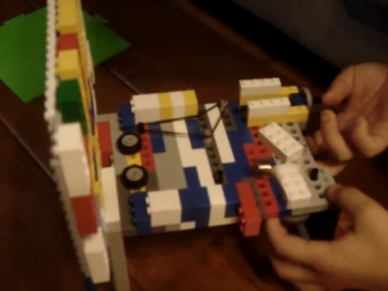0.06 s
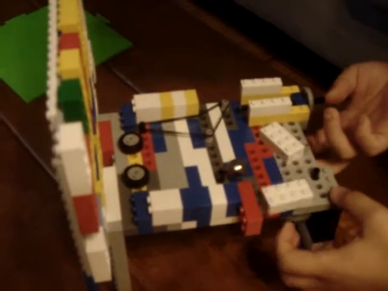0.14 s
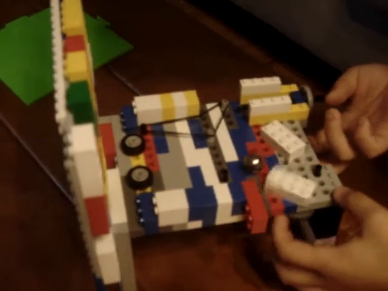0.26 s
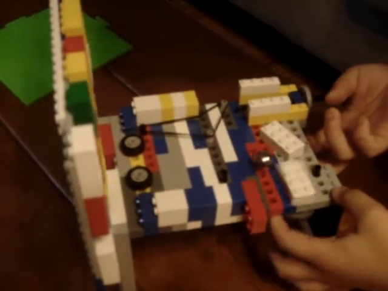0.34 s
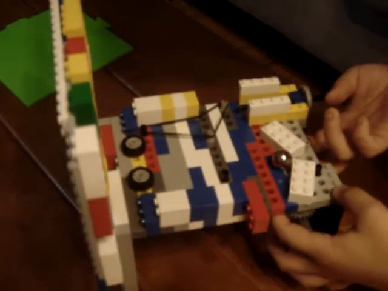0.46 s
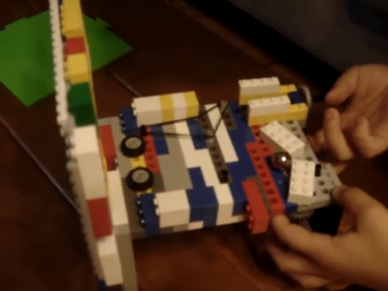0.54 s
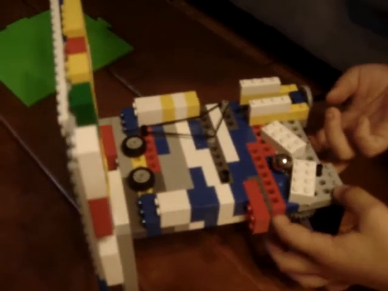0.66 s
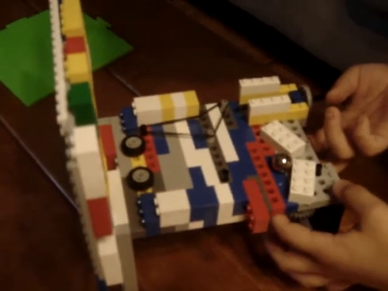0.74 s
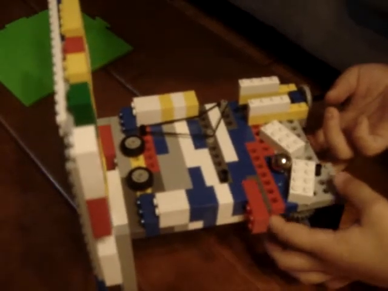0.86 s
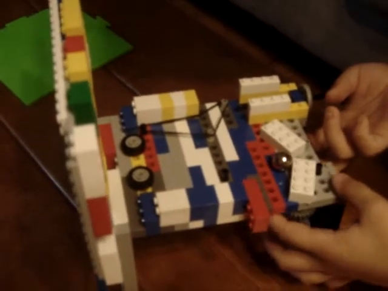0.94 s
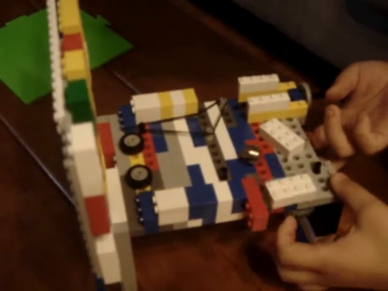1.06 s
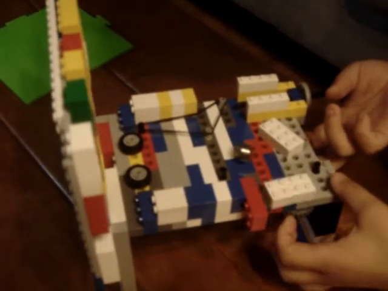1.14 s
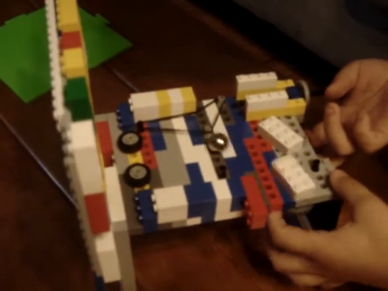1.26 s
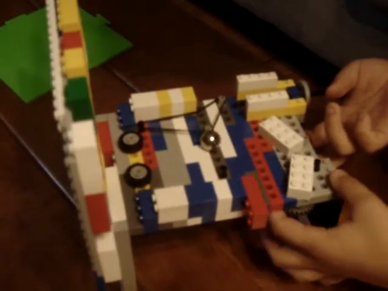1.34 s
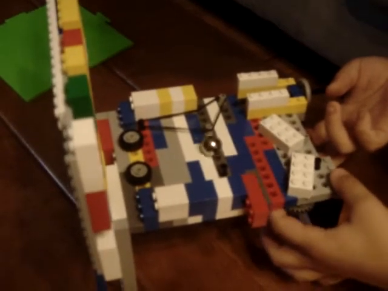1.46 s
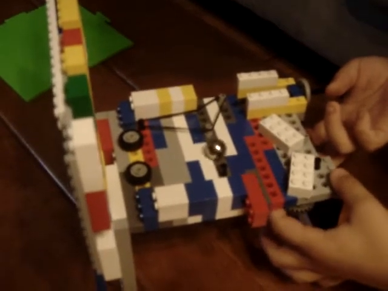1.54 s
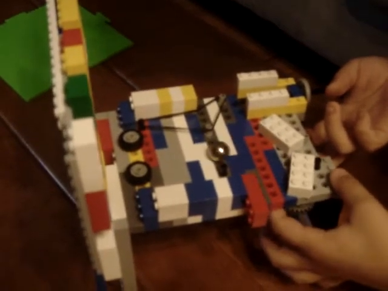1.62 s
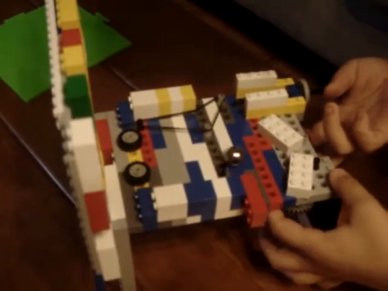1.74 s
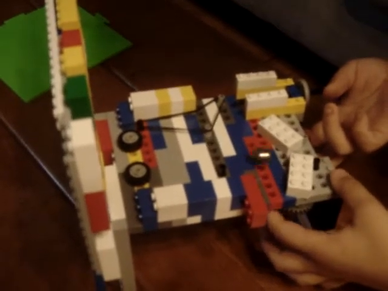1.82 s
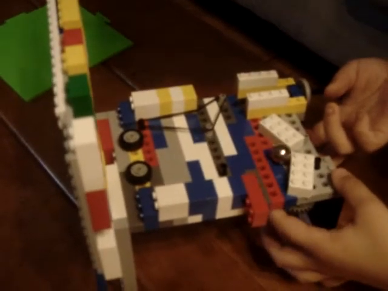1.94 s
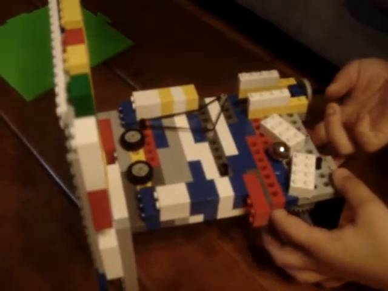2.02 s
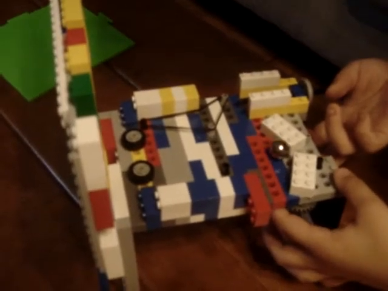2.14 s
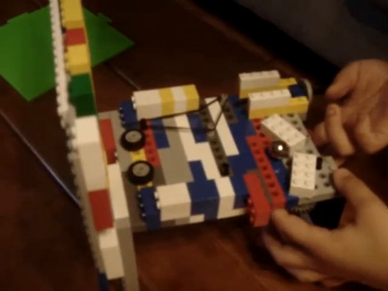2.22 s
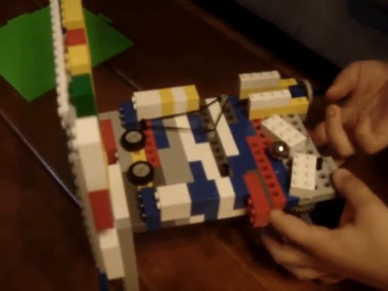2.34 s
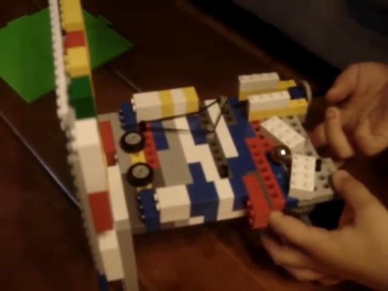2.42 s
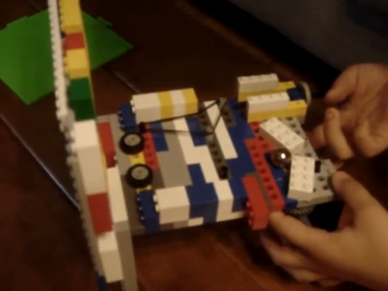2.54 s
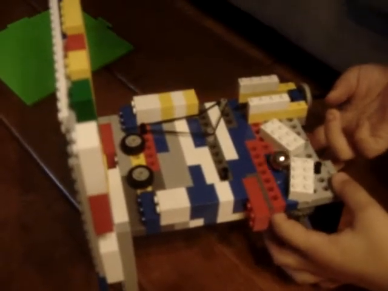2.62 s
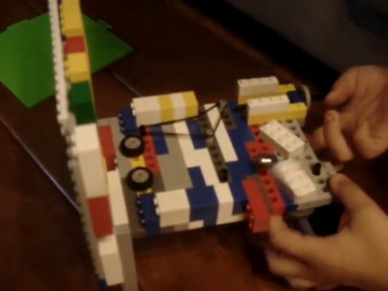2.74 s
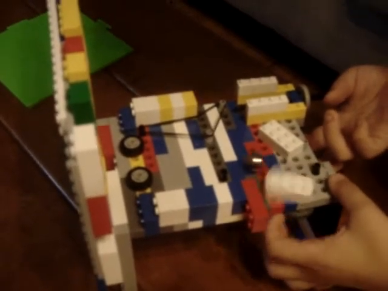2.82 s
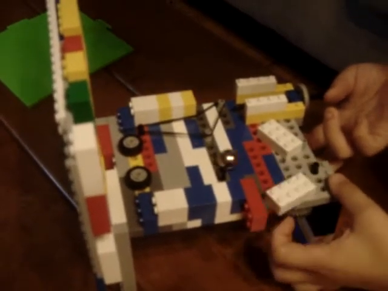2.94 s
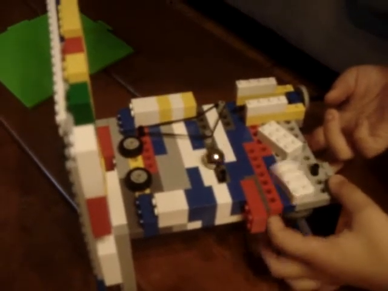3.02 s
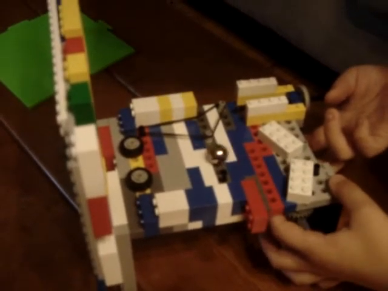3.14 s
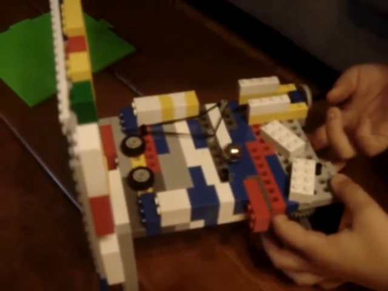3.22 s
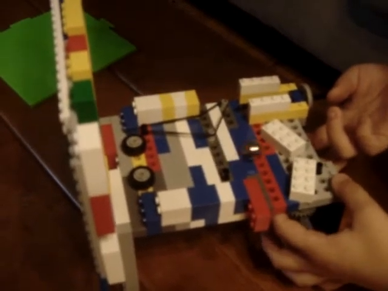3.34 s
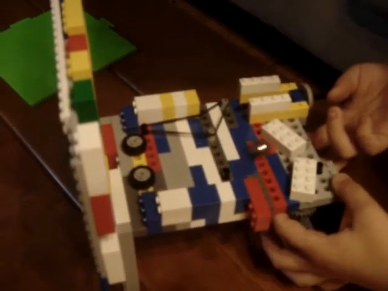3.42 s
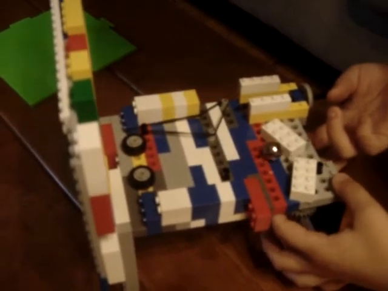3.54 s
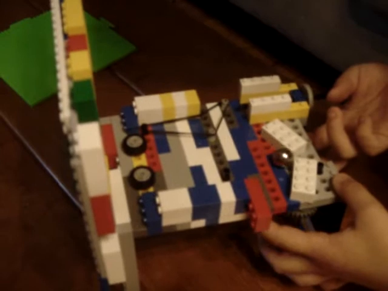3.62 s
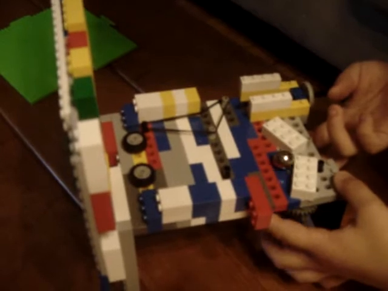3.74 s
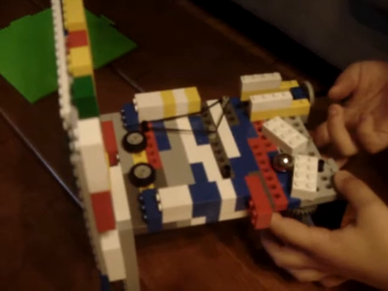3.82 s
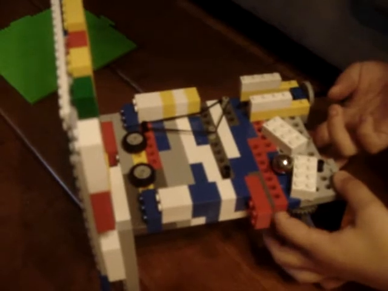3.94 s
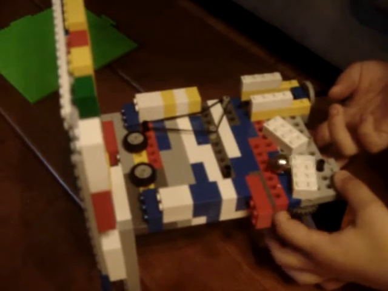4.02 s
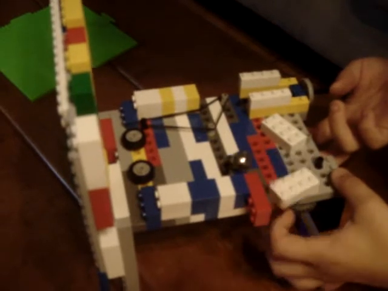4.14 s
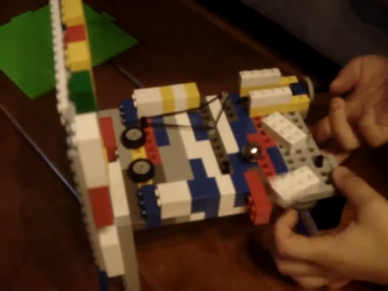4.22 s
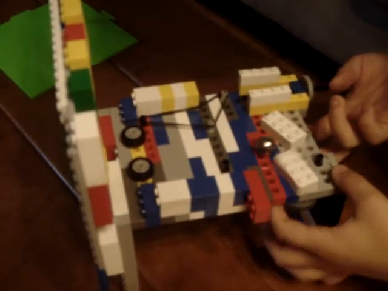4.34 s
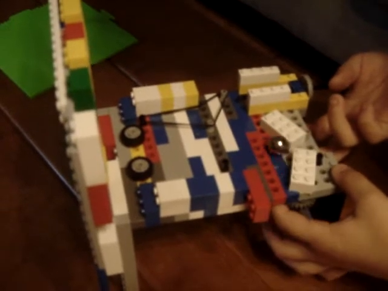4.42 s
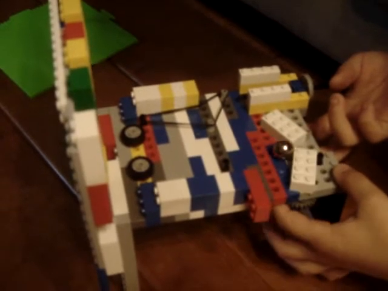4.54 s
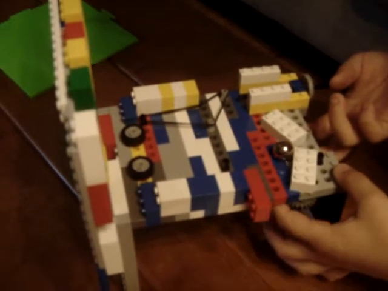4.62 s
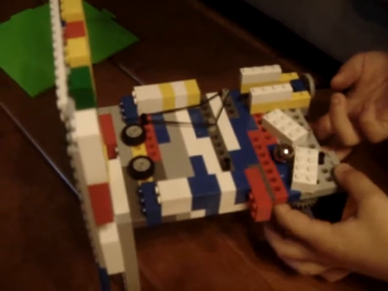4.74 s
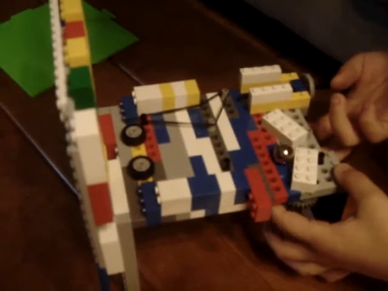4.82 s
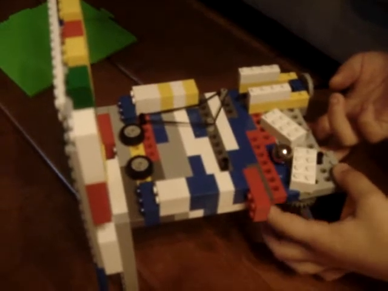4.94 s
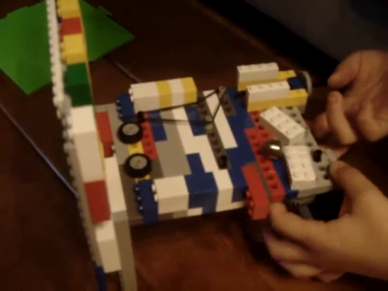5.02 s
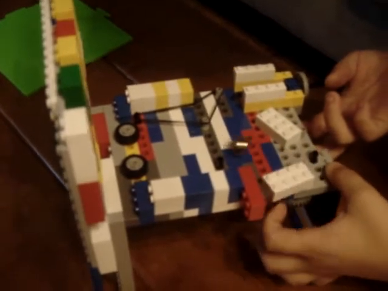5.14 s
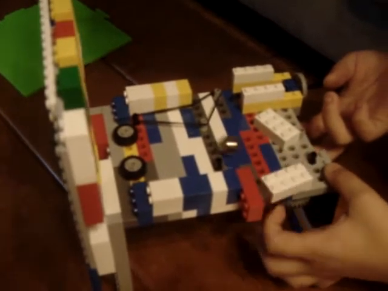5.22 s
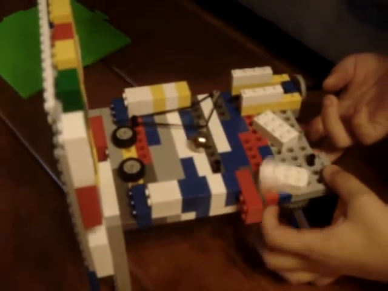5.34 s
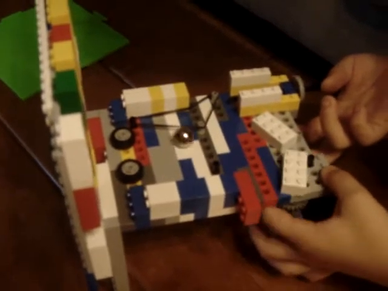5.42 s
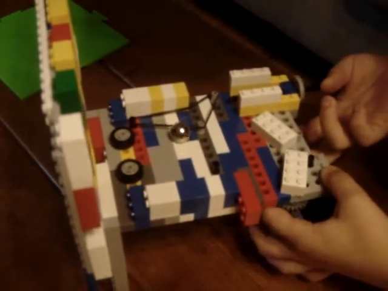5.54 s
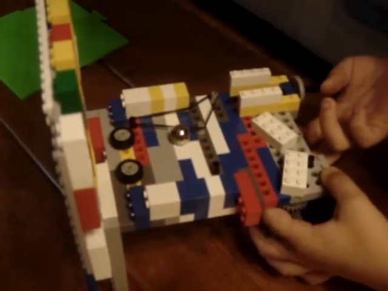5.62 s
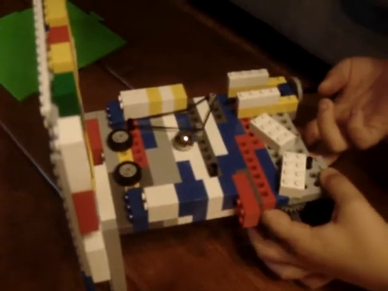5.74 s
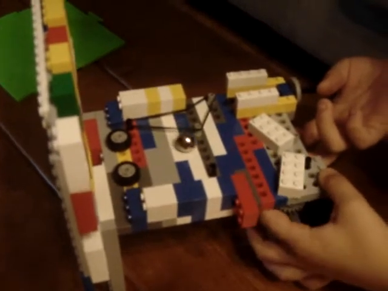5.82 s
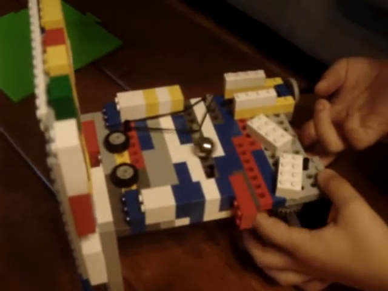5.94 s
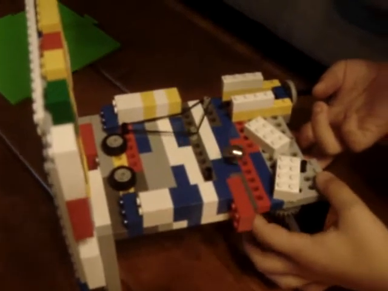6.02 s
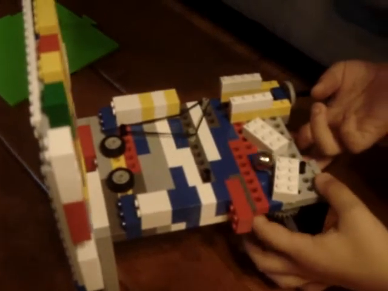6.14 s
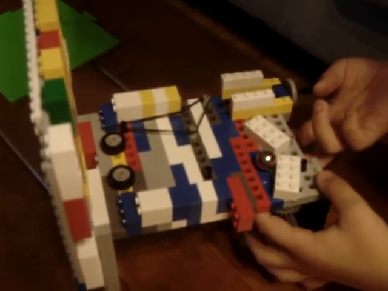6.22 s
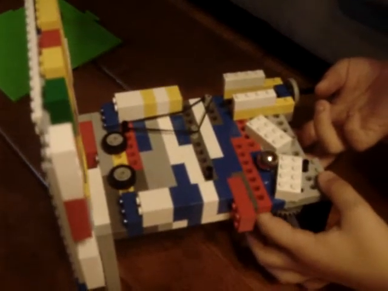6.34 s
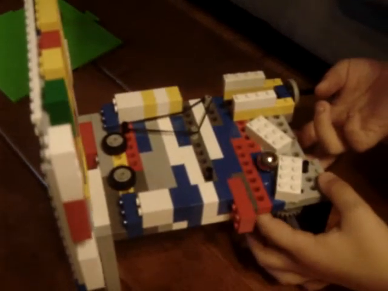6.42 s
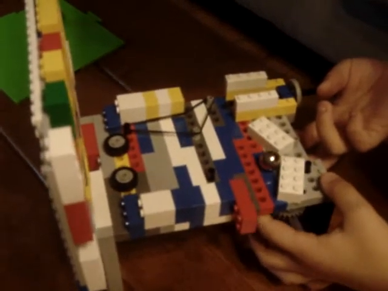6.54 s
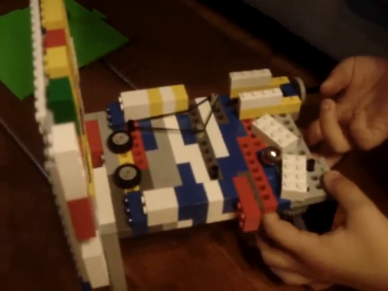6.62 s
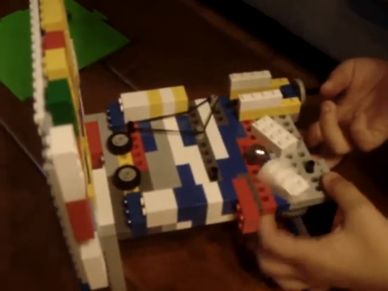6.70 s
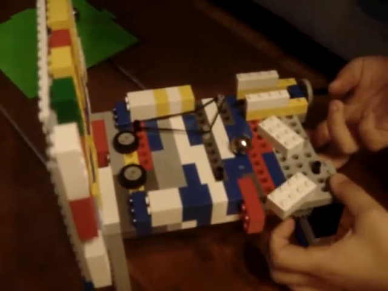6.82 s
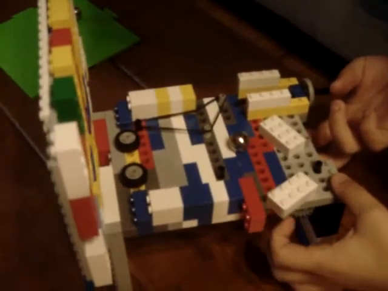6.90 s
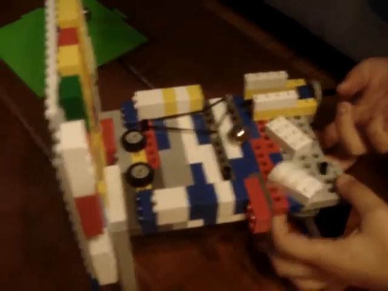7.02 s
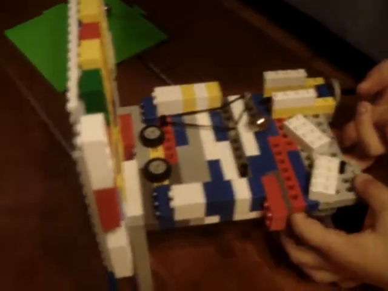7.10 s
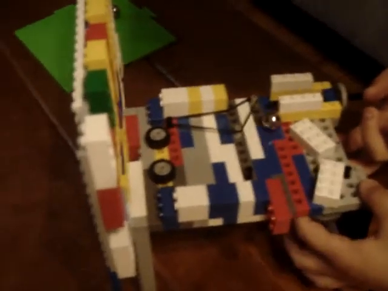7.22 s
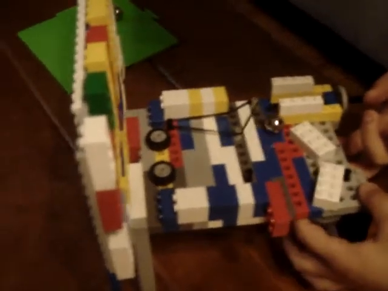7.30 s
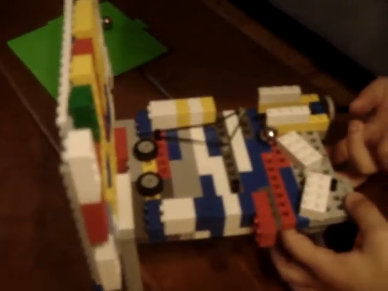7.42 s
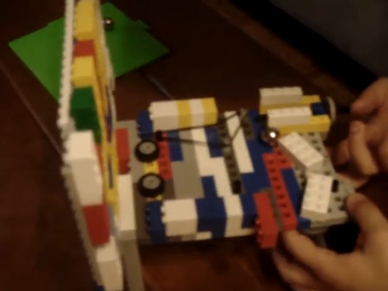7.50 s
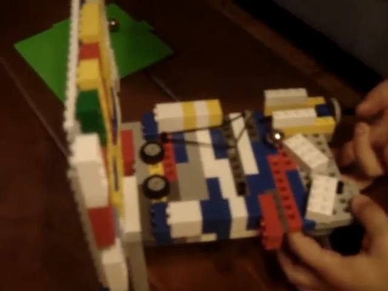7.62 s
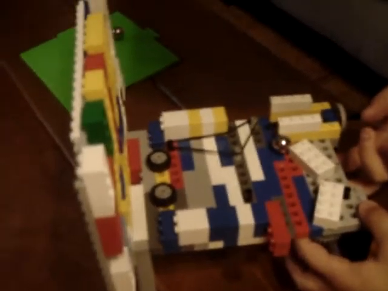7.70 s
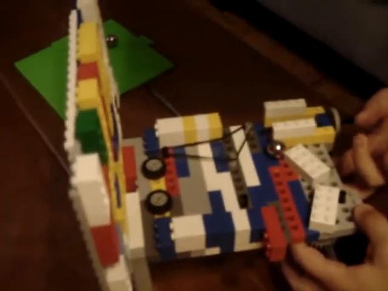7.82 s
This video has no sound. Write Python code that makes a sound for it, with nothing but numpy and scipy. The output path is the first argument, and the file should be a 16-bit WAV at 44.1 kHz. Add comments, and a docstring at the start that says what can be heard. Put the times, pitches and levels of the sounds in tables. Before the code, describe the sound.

Close up in a small room, a pinball machine of plastic bricks is played on a wooden table. Six sharp flipper snaps, each with a loose rattle, send a small steel ball rolling faintly over tiles and clacking against hollow walls. The base thuds softly. Behind it a vehicle-like rush and low engine hum swell and fade, over microphone hiss and a thin high whine.

```python
"""In a small room, a pinball machine of plastic bricks plays on a wooden table.
Flippers snap and a steel ball clacks on brick walls: shaped noise bursts excite resonances and damped modes.
The base thuds on the table and the ball chatters over tiles, while the room returns reflections and a tail.
Behind, coloured noise and two rising engine harmonics swell and fade, like a vehicle passing outside;
a steady hiss and a thin electronic whine lie underneath."""
import sys
import numpy as np
from scipy import signal
from scipy.fft import rfft, irfft, next_fast_len
from scipy.io import wavfile
from scipy.ndimage import uniform_filter1d, map_coordinates

SR = 44100
rng = np.random.default_rng(int(sys.argv[2]) if len(sys.argv) > 2 else 0)


def waveform_to_disk(signal):
    """Save audio, clipped to [-1, 1], as 16-bit WAV at the path in sys.argv[1]."""
    frames = np.transpose(np.atleast_2d(signal))
    scaled = np.clip(frames, -1, 1) * 32767
    samples = np.round(scaled).astype(np.int16)
    wavfile.write(sys.argv[1], SR, samples)


N = 347033

# Contact levels below stand ahead of the gain of the function that plays them.
# strokes of the flipper: [t/s, body level/dB, clack level/dB, edge level/dB, looseness (times the decay),
# time to the stop/s, time to the slide back/s, slide level/dB, clatter level/dB, clatter time/s, roll time/s]
FLIPS = [(0.131, -30.5, -25, -23.5, 2.3, 0.015, 0.13, -36.5, -31, .05, 0.55),
         (1.1023, -25, -23.5, -17.5, 2.1, 0.024, 0.12, -39.5, -23, 0.1, 1),
         (2.8222, -31, -24.5, -23, 2, 0.021, 0.21, -39.5, -21, 0.033, 0.53),
         (4.1055, -30.5, -27, -25, 2.5, 0.023, 0.22, -38.5, -25, 0.094, 0.23),
         (5.153, -30, -20.5, -17.5, 1.9, .019, .197, -44, -27, .06, 1),
         (6.782, -31.5, -20.5, -18, 1.8, 0.024, 0.2, -38.5, -35, 0.033, 0.95)]
# the flipper's own ring and its upper ring: [f/Hz, f/Hz]
FLIPPER_HZ = (3385, 6540)
# dull top of a flipper, which has no hard steel contact: [f/Hz, level/dB]
FLIPPER_TOP = [(7200, -1.5), (8200, -10.5), (10000, -8.5)]
# impact on the stop: body and clack relative to the snap (dB), looseness
STOP_BODY_DB, STOP_CLACK_DB, STOP_LOOSENESS = 0.5, -8, 3
# slide back with a long, faint rattle: clack relative to body (dB), looseness
SLIDE_CLACK_DB, SLIDE_LOOSENESS = -3.5, 7
# clatter on the axle: mean gap (s), fall over the clatter time (dB), scatter (dB)
TAP_GAP_S, TAP_FALL_DB, TAP_SCATTER_DB = 0.0064, 8, 6.5

# impacts of the ball on bricks: [t/s, body level/dB, clack level/dB, edge level/dB,
# ring f/Hz, upper ring f/Hz, looseness (times the decay)]
KNOCKS = [(0.181, -32.5, -44, -49, 3200, 6800, 0.88), (0.203, -30, -44, -36.5, 1100, 6800, 1.6),
          (0.448, -36, -43.5, -61, 2730, 6300, 0.47), (0.4752, -35.5, -36, -68, 4170, 6300, 0.47),
          (0.492, -27.5, -30.5, -20.5, 3930, 7000, 0.6), (0.4992, -35, -27, -21.5, 4400, 6950, 3.1),
          (0.751, -44, -43.5, -47, 4350, 6800, 1.1), (1.051, -36.5, -42, -44, 4280, 6900, 1.5),
          (1.086, -31, -43, -62, 3950, 6500, 0.6), (1.118, -14, -23.5, -26, 990, 6800, 1.2),
          (1.384, -29, -31.5, -27, 1450, 7200, 1.15), (1.63, -31, -54, -52, 1090, 6500, 0.65),
          (1.746, -38, -47.5, -44, 4570, 6300, 1.2), (1.815, -34.5, -46, -49, 4140, 6460, 1.9),
          (1.948, -34, -45, -47, 4730, 6260, 0.43), (1.986, -22, -18, -17.5, 3790, 7640, 0.7),
          (2.0003, -32, -29, -31, 3960, 6300, 1.1), (2.556, -40, -40, -46, 3670, 6260, 1.5),
          (3.1717, -29.5, -32.5, -30, 4150, 7000, 0.79), (3.4459, -28.5, -42, -45, 4010, 6500, 1.2),
          (3.489, -28, -37, -51, 4330, 6500, 0.52), (3.497, -22, -24.5, -22.5, 4200, 8700, 1.8),
          (3.51, -38, -25.5, -43, 4730, 6200, 0.98), (3.53, -36, -34, -35, 4400, 6200, 1.4),
          (3.565, -44, -36.5, -34, 4520, 8550, 2), (3.7301, -39, -32, -26, 4160, 6530, 3),
          (4.116, -36, -29, -34, 3300, 6800, 1), (4.132, -36, -27.5, -33, 3330, 6800, 1.9),
          (4.155, -27.5, -39, -41, 3400, 6800, 0.8), (4.1807, -24, -36.5, -39, 3220, 6750, 0.81),
          (4.194, -37, -40, -46, 3500, 6800, .8), (4.363, -38, -41.5, -49, 3180, 6500, 1.2),
          (4.4777, -30, -23, -20.5, 4220, 6340, 0.88), (4.4861, -25.5, -24.5, -22.5, 4220, 6100, 1.06),
          (4.503, -32.5, -30, -32, 4400, 6200, 1.2), (4.516, -54, -40, -33, 4300, 6200, 1.3),
          (4.597, -35, -37, -32, 3600, 6400, 0.97), (4.87, -41, -39, -42.5, 4370, 6300, 1.4),
          (5.061, -37.5, -47, -49, 4730, 6500, 1.4), (5.2376, -27, -40, -44, 1130, 6500, 1.8),
          (5.285, -36, -54, -56, 1360, 6500, .6), (5.535, -46, -39.5, -46.5, 4200, 6350, 0.8),
          (6.078, -35.5, -46, -49, 4480, 6500, 2.1), (6.1537, -26.5, -37.5, -38, 860, 6600, 1.8),
          (6.191, -33, -43, -60, 4770, 6500, 0.54), (6.2269, -21.5, -16, -16.5, 4000, 7730, 0.77),
          (6.238, -26, -37, -26, 1000, 7200, 1.5), (7.1544, -38, -38.5, -44, 4640, 6300, 0.79),
          (7.274, -22, -30.5, -34, 1930, 6840, 0.82), (7.4815, -33, -30.5, -37, 1910, 6500, 1.8),
          (7.493, -41, -30, -38.5, 4760, 6400, 0.63), (7.536, -41.5, -47, -42, 4400, 6800, 1.6),
          (7.6422, -33.5, -59, -56, 1320, 6500, 0.55)]
# chatter of shaken bricks: mean gap (s), level relative to the clack (dB), fall (dB per s), scatter (dB)
SHAKE_GAP_S, SHAKE_DB, SHAKE_FALL_DB_PER_S, SHAKE_SCATTER_DB = 0.012, -6, 150, 5

# bands of a contact (plate, body, clack, edge): [low f/Hz, high f/Hz, t60/s at looseness 1]
CLICK_PARTS = [(181, 628, 0.072), (776, 2120, 0.048), (2570, 4600, 0.033), (6240, 10100, 0.012)]
# resonances of the brick build: [f/Hz, width/Hz, level/dB]
BRICKS = [(325.6, 6.5, 8), (355, 25, 0), (480, 27, -3.5), (598.5, 33, 5.5), (861, 31, 4), (1204, 206, 6.5),
          (1776, 330, 1.5), (2236, 98, -1), (4270, 1300, -4.5), (6100, 240, -5), (6880, 740, -5.5),
          (8900, 510, -10)]
# clear modes of the hollow bricks: [f/Hz, level/dB relative to the clack, t60/s]
BRICK_MODES = [(1652, -11, 0.096), (1865, -11, .07), (2334, -12.5, 0.064), (3150, -11, 0.092),
               (3696, -10, 0.068), (3972, -1.5, 0.049), (4330, -14.5, 0.063)]
# initial time over which the rms levels of contacts and thuds hold (s)
CLICK_SPAN, THUD_SPAN = 0.01, 0.03
# force of a medium blow (dB)
MEDIUM_DB = -30
# a harder, shorter blow gives less to the plate: level relative to body (dB), change per dB of force
PLATE_DB, PLATE_PER_DB = -5, -0.24
# strength of the struck brick's two rings among the resonances of the build (dB)
RING_DB, UPPER_RING_DB = 6, -2
# both rings outlast the blow: level relative to it (dB), t60 (s)
STRUCK_DB, STRUCK_T60_S, UPPER_DB, UPPER_T60_S = -6.5, 0.035, -18, 0.05
# a light touch starts more softly: attack at a medium blow (s), dB of that time per dB of force
CONTACT_ATTACK_S, ATTACK_PER_DB = 0.00046, -0.5
# and is duller: top at a medium edge level (Hz), Hz per dB of edge level
CONTACT_TOP_HZ, TOP_HZ_PER_DB = 9100, 91

# impact of the ball on the hollow side wall: [t/s, level/dB]
WALL_HIT = (7.2745, -30.5)
# modes of that wall: [f/Hz, level/dB relative to the impact, t60/s]
WALL_MODES = [(865, -13, .09), (1230, 5, 0.22), (1385, -0.5, 0.25), (1717, -17, 0.11), (2180, 9, 0.054),
              (3128, -14, 0.088)]
# light ticks of the ball on seams and of the levers: [t/s, level/dB]
TICKS = [(0.0727, -35), (0.898, -44), (0.965, -42), (1.0415, -34.5), (1.566, -41), (1.699, -40),
         (2.3665, -39.5), (2.433, -40), (2.4997, -41), (2.7526, -35), (2.904, -39), (3.0435, -51),
         (3.669, -38), (3.968, -42), (4.005, -32.5), (4.065, -34.5), (4.769, -42), (4.835, -42),
         (5.103, -37.5), (5.939, -35), (6.027, -41), (6.5375, -40), (6.758, -32.5), (7.04, -35.5),
         (7.356, -42), (7.705, -41.5), (7.772, -41)]

# rocking of the base on the table: [t/s, table level/dB, plate level/dB, rattling-brick level/dB]
THUDS = [(0.099, -61, -35.5, -38), (0.123, -49, -34, -28.5), (0.254, -30, -32, -41), (0.294, -31, -36, -50),
         (0.314, -32, -33, -33), (0.335, -34, -35.5, -31.5), (0.492, -40.5, -30, -30),
         (1.102, -49, -40, -41), (1.12, -49, -24.5, -35), (1.226, -36.5, -32.5, -37.5),
         (1.984, -45, -40, -48), (2.9, -39.5, -32, -32.5), (4.081, -33, -32, -34), (4.245, -43, -39.5, -57),
         (5.112, -60, -41, -37), (5.135, -62, -30, -34), (5.242, -42, -37, -38), (5.266, -41, -37, -44),
         (6.225, -41, -37, -46), (6.33, -45, -58, -55), (7.186, -35, -53, -62), (7.642, -54, -29.5, -48)]
# bands of a thud (table, plate, bricks): [low f/Hz, high f/Hz, t60/s]
THUD_PARTS = [(153, 220, 0.21), (234, 550, 0.092), (623, 5600, 0.15)]
# resonances of table and plate: [f/Hz, width/Hz, level/dB]
TABLE = [(164.7, 17, 7), (209.3, 5.3, 9), (296, 21, -12), (377, 71, 9.5), (563, 16, 7.5), (875, 660, 4),
         (1250, 420, -2)]
# ring of the tiles as the ball crosses their seams: [f/Hz, width/Hz, level/dB]
TILE_RING = (4352, 42, 4.3)

# swell of the road noise: [t/s, level/dB before the rumble and tyre gains]
TRAFFIC = [(0.6, -47.5), (1.02, -44), (1.18, -41.5), (3.47, -35), (4.37, -39), (4.63, -41), (6.11, -37),
           (6.53, -41), (7.42, -43.5), (7.87, -44)]
# spectral shapes of the rumble and of the tyres: [f/Hz, level/dB]
RUMBLE = [(24, -64.5), (40, -70.5), (97, -11.5), (118, -21.5), (172, -2), (183, -9), (247, 3.5), (306, 4.5),
          (337, -1.5), (477, 2), (513, -7), (551, -2), (700, -19), (910, -29), (1540, -120)]
TYRES = [(320, -33), (550, 0.5), (729, -1), (967, 4), (1040, 0.5), (1170, -1.5), (1590, -7.5),
         (1940, -10.5), (2990, -23), (4000, -28.5), (5200, -23), (8800, -120)]
# mean firing rate as the engine gathers speed: [t/s, f/Hz]
ENGINE_SPEED = [(0, 89.6), (1.4, 92.1), (1.84, 92.55), (2.5, 94.5), (2.68, 98.6), (3.4, 100.2),
                (4.8, 100.8), (5.6, 103.3), (6.5, 103.3), (7.87, 106.3)]
# second and third harmonics of the firing rate: [t/s, level/dB before the drone gain]
LOW_DRONE = [(0, -58), (1.4, -57), (1.62, -42.5), (2.1, -41.5), (2.47, -40.5), (2.6, -57.5), (7.87, -68)]
HIGH_DRONE = [(0, -58.5), (1.8, -49), (2.4, -45), (2.75, -46), (3.0, -41.5), (3.42, -37), (3.85, -42),
              (4.05, -54), (4.4, -47), (4.58, -41), (4.85, -46), (5.1, -64), (5.45, -52), (5.65, -44),
              (5.9, -69), (6.16, -42.5), (6.6, -47.5), (6.9, -57.5), (7.87, -58)]
# room resonance that follows the third harmonic's level: [f/Hz, width/Hz, level/dB relative to it]
BOOM = (490, 6.6, -5)

# spectral shape of the hiss: [f/Hz, level/dB]
HISS = [(25, -17), (60, -6.5), (150, 14), (400, -8.5), (2500, -1), (4500, 1.5), (6000, -3), (7500, 0),
        (9000, -7), (10000, -12)]
# electronic whine and upper band limit (Hz)
WHINE_HZ, TOP_HZ = 8032, 10050
# decay of the room: [f/Hz, t60/s]
ROOM = [(150, 0.67), (500, 0.26), (1500, 0.25), (4000, 0.35), (9000, 0.42)]
# colour of the room's answer: [f/Hz, level/dB]
WALLS = [(100, -8), (300, 2), (900, 2), (2000, -1.5), (4000, -4.5), (7000, -12.5), (10000, -20)]


def flippers(gain_db=-2, stop_edge_db=-10, slide_edge_db=-10):
    """Successive impacts of a lever: snap, stop, clatter on the axle and a rattling slide back."""
    track, clatter = np.zeros(N), []
    for (s, body_db, clack_db, edge_db, looseness, travel, held,
         slide_db, clatter_db, length, _) in FLIPS:
        track += contact(s, body_db, clack_db, edge_db, *FLIPPER_HZ, looseness)
        track += contact(s + travel, body_db + STOP_BODY_DB, clack_db + STOP_CLACK_DB,
                         edge_db + stop_edge_db, *FLIPPER_HZ, STOP_LOOSENESS)
        track += contact(s + held, slide_db, slide_db + SLIDE_CLACK_DB,
                         slide_db + slide_edge_db, *FLIPPER_HZ, SLIDE_LOOSENESS, ring_q=3)
        delays = TAP_GAP_S * np.cumsum(0.5 + rng.random(size=20))
        levels = clatter_db - TAP_FALL_DB * delays / length
        levels = levels + TAP_SCATTER_DB * rng.standard_normal(size=20)
        clatter += [(s + delay, db) for delay, db in zip(delays, levels) if delay < length]
    track += taps(clatter, t60=0.012, attack=0.0002, lo_hz=2200, hi_hz=9000, wet_db=-3)
    return amp(gain_db) * filtered(track, lambda hz: amp(along(FLIPPER_TOP, hz)))


def knocks(gain_db=-2):
    """Impact excitation: the ball strikes walls and flippers, and shaken bricks chatter in their seats."""
    chatter = []
    for s, _, clack_db, *_ in KNOCKS:
        delays = SHAKE_GAP_S * np.cumsum(0.5 + rng.random(size=8))
        levels = clack_db + SHAKE_DB - SHAKE_FALL_DB_PER_S * delays
        levels = levels + SHAKE_SCATTER_DB * rng.standard_normal(size=8)
        chatter += zip(s + delays, levels)
    blows = sum(contact(*knock) for knock in KNOCKS)
    shaken = taps(chatter, t60=0.009, attack=0.00026, lo_hz=1400, hi_hz=8500, wet_db=-10)
    return amp(gain_db) * (blows + shaken)


def contact(s, body_db, clack_db, edge_db, ring_hz, upper_hz, looseness,
            ring_q=20, upper_q=16, scrape_db=-20, lead=0.0026, wet_db=-2.0):
    """Force-dependent contact: a harder blow starts faster and brighter; loose parts scrape just before."""
    plate_db = body_db + PLATE_DB + PLATE_PER_DB * (body_db - MEDIUM_DB)
    levels = [plate_db, body_db, clack_db, edge_db]
    build = [*BRICKS, (upper_hz, upper_hz / upper_q, UPPER_RING_DB)]
    struck_build = [*build, (ring_hz, ring_hz / ring_q, RING_DB)]
    force_db = max(body_db, clack_db) - MEDIUM_DB
    attack = CONTACT_ATTACK_S * amp(ATTACK_PER_DB * force_db)
    hit = blow(levels, CLICK_PARTS, struck_build, valley_db=-37, attack=attack, hold=0.003,
               span=CLICK_SPAN, looseness=looseness)
    # the whole build rattles with the blow and sends a broader sound into the room
    rattle = blow(levels, CLICK_PARTS, build, valley_db=-9, attack=0.0015, hold=0.003,
                  span=CLICK_SPAN, looseness=looseness)
    heard = hit + amp(wet_db) * room(evened(rattle))
    top_hz = CONTACT_TOP_HZ + TOP_HZ_PER_DB * (edge_db - MEDIUM_DB)
    track = np.zeros(N)
    add(track, s, filtered(heard, lambda hz: band(hz, 0, top_hz)))
    add(track, s, amp(clack_db) * ringing(BRICK_MODES, scatter_db=4.5))
    # a low ring follows the body's level, a high one the clack's
    ring_db = body_db if ring_hz < CLICK_PARTS[1][1] else clack_db
    struck = [(ring_hz, ring_db + STRUCK_DB, STRUCK_T60_S), (upper_hz, edge_db + UPPER_DB, UPPER_T60_S)]
    add(track, s, ringing(struck, scatter_db=0.0))
    add(track, s - lead, amp(scrape_db) * rattle)
    return track


def side_wall(wet_db=-5):
    """Free vibration: the struck hollow wall rings in a few damped modes."""
    s, hit_db = WALL_HIT
    ring = amp(hit_db) * ringing(WALL_MODES, scatter_db=1.5)
    track = np.zeros(N)
    add(track, s, ring + amp(wet_db) * room(ring))
    return track


def ticks(gain_db=0):
    """Weak impact: a slower attack makes the ticks between the blows light and soft."""
    return amp(gain_db) * taps(TICKS, t60=0.03, attack=0.001, lo_hz=2110, hi_hz=7200, wet_db=-2)


def thuds(gain_db=-4.0, wet_db=-4):
    """Coupled resonance: the rocking machine excites low table and plate resonances."""
    track = np.zeros(N)
    for s, *levels in THUDS:
        hit = blow(levels, THUD_PARTS, TABLE, valley_db=-21.0, attack=0.0033, hold=0.0041,
                   span=THUD_SPAN, looseness=1.0, grain_db=0)
        add(track, s, hit + amp(wet_db) * room(hit))
    return amp(gain_db) * track


def rolling(roll_db=-56, idle_db=-59, rise=0.06, fall=0.027, uneven_db=3):
    """Rolling excitation: random ticks ring the tiles, louder after each stroke and faint in between."""
    t = np.arange(N) / SR
    moving = np.zeros(N)
    for s, *_, length in FLIPS:
        moving += np.clip((t - s) / rise, 0, 1) * np.clip((s + length - t) / fall, 0, 1)
    # on average 2600 ticks a second
    impulses = (rng.random(N) < 2600 / SR) * rng.standard_normal(N)
    tile_modes = [*BRICKS, TILE_RING]
    tiles = filtered(impulses, lambda hz: resonances(tile_modes, hz, valley_db=-13.0)
                     * band(hz, 610, 4400, order=6))
    level = (amp(idle_db) + amp(roll_db) * moving) * amp(uneven_db * wobble(10))
    return level * unit(tiles + room(tiles))


def traffic(rumble_db=-5.5, tyre_db=-2, drone_db=-2.5, waver_db=2.0):
    """Broadband and harmonic radiation: tyre rush swells and fades while two engine harmonics boom in turn."""
    level_db, = curves(TRAFFIC)
    speed_hz, = curves(ENGINE_SPEED)
    low_db, = curves(LOW_DRONE)
    high_db, = curves(HIGH_DRONE)
    phase = 2 * np.pi * np.cumsum(speed_hz * (1 + 0.005 * wobble(12))) / SR
    drone = np.zeros(N)
    for harmonic, db in [(2, low_db), (3, high_db)]:
        drone += amp(db + waver_db * wobble(11)) * unit(np.sin(harmonic * phase))
    boom_hz, width_hz, boom_db = BOOM
    hum = filtered(rng.standard_normal(N), lambda hz: np.exp(-((hz - boom_hz) / width_hz) ** 2))
    boom = amp(high_db + boom_db) * unit(hum)
    rumble = amp(rumble_db + 1.17 * wobble(8.5)) * noise(RUMBLE)
    tyres = amp(tyre_db + wobble(7.1)) * noise(TYRES)
    return amp(level_db) * (rumble + tyres) + amp(drone_db) * (drone + boom)


def hiss(hiss_db=-56, whine_db=-64.0, halo_db=-70, width_hz=90):
    """Stationary noise: microphone hiss, and a pure electronic tone in a narrow noise halo."""
    whine = np.sin(2 * np.pi * WHINE_HZ * np.arange(N) / SR)
    halo = filtered(rng.standard_normal(N), lambda hz: np.exp(-((hz - WHINE_HZ) / width_hz) ** 2))
    return amp(hiss_db) * noise(HISS) + amp(whine_db) * unit(whine) + amp(halo_db) * unit(halo)


def room(x, gap=0.004, early=0.06, lumpy_db=3):
    """Reverberation: a few early reflections and a decaying tail that returns in uneven bunches."""
    hz, t, z = signal.stft(rng.standard_normal(size=11025), SR, nperseg=256)
    decay = amp(-60 * t / along(ROOM, hz)[:, None])
    tail = signal.istft(z * decay, SR, nperseg=256)[1]
    tail = tail * amp(lumpy_db * wobble(305.4, size=len(tail)))
    tail = tail / np.linalg.norm(tail)
    delays = rng.uniform(0.0028, 0.022, size=12)
    tail[(delays * SR).astype(int)] += early * rng.choice([-0.5, 0.5], size=12)
    response = np.pad(tail, (int(gap * SR), 0))
    answer = signal.fftconvolve(x, response)[:len(x)]
    return filtered(answer, lambda hz: amp(along(WALLS, hz)))


def blow(levels, parts, modes, valley_db, attack, hold, span, looseness, grain_db=4.0):
    """Damped noise excitation: chatter for hold s, then decay by band; levels are rms over span s."""
    t = np.arange(SR // 4) / SR
    hz = np.fft.rfftfreq(len(t), 1 / SR)
    chatter = rfft(rng.standard_normal(len(t))) * resonances(modes, hz, valley_db)
    # the unevenness grows to its full depth over the span
    grain = amp(grain_db * np.minimum(t / span, 1) * wobble(452, size=len(t)))
    onset = (1 - np.exp(-t / attack)) * grain
    sound = np.zeros(len(t))
    for db, (lo, hi, t60) in zip(levels, parts):
        decay = amp(-60 * np.maximum(t - hold, 0) / (t60 * looseness))
        part = irfft(chatter * band(hz, lo, hi), len(t)) * onset * decay
        sound += amp(db) * part / np.sqrt(np.mean(part[:int(span * SR)] ** 2))
    return sound


def taps(hits, t60, attack, lo_hz, hi_hz, wet_db):
    """Superposed small impacts [t/s, level/dB]: brief bursts in brick resonances, with the room's answer."""
    t = np.arange(SR // 10) / SR
    envelope = np.zeros(N)
    for s, db in hits:
        add(envelope, s, amp(db - 60 * t / t60) * (1 - np.exp(-t / attack)))
    grain = filtered(rng.standard_normal(N), lambda hz: resonances(BRICKS, hz, valley_db=-19.5)
                     * band(hz, lo_hz, hi_hz))
    direct = envelope * unit(grain)
    return direct + amp(wet_db) * room(direct)


def ringing(modes, scatter_db):
    """Modal superposition: damped sines, each with a new strength and phase at every blow."""
    t = np.arange(SR // 5) / SR
    ring = np.zeros(len(t))
    for hz, db, t60 in modes:
        decay = amp(db + scatter_db * rng.standard_normal() - 60 * t / t60)
        ring += decay * np.sin(2 * np.pi * (hz * t + rng.random()))
    return ring * (1 - np.exp(-t / 0.0004))


def evened(x, above_hz=4500, size=300):
    """Radiation in all directions: the narrow peaks and dips of the treble even out."""
    z = rfft(x)
    power = np.abs(z) ** 2 + 1e-12
    smooth = np.abs(uniform_filter1d(power, size))
    treble = band(np.fft.rfftfreq(len(x), 1 / SR), above_hz, SR)
    return irfft(z * (smooth / power) ** (treble / 2), len(x))


def resonances(modes, hz, valley_db):
    """Resonance: Lorentzian power peaks of a body over a floor between them."""
    power = amp(valley_db) ** 2
    for centre, width, db in modes:
        power = power + amp(db) ** 2 / (1 + ((hz - centre) / (width / 2)) ** 2)
    return np.sqrt(power)


def band(hz, lo, hi, order=12):
    """Band limitation: gain that falls below lo and above hi."""
    return 1 / np.sqrt((1 + (lo / (hz + 1)) ** order) * (1 + (hz / hi) ** order))


def noise(spectrum):
    """Spectral shaping: coloured noise of rms 1."""
    return unit(filtered(rng.standard_normal(N), lambda hz: amp(along(spectrum, hz))))


def filtered(x, response):
    """Linear filtering: multiply the spectrum of x by a response of frequency."""
    m = next_fast_len(len(x) + 8192)
    return irfft(rfft(x, m) * response(np.fft.rfftfreq(m, 1 / SR)), m)[:len(x)]


def wobble(rate, size=N):
    """Slow random modulation: a smooth curve through rate random knots a second."""
    knots = rng.standard_normal(int(size * rate / SR) + 4)
    return map_coordinates(knots, [np.arange(size) * rate / SR])


def curves(rows):
    """Linear interpolation in time: one value per sample for each column after t/s."""
    s, *cols = np.transpose(rows)
    return [np.interp(np.arange(N) / SR, s, c) for c in cols]


def along(points, hz):
    """Interpolation on a logarithmic frequency axis through points [f/Hz, value]."""
    f, v = np.transpose(points)
    return np.interp(np.log(hz + 1), np.log(f + 1), v)


def add(track, s, sound):
    """Superposition: mix a sound into a track at time s."""
    start = max(round(s * SR), 0)
    track[start:start + len(sound)] += sound[:N - start]


def amp(db):
    """Level law: the amplitude ratio of a level in dB."""
    return 10 ** (np.asarray(db) / 20)


def unit(x):
    """Normalisation: scale x to rms 1."""
    return x / np.sqrt(np.mean(x ** 2) + 1e-20)


def scene():
    """Superposition of all sources, from the machine to the background."""
    machine = flippers() + knocks() + side_wall() + ticks() + thuds() + rolling()
    return (machine + traffic() + hiss())[None]


def record(dry, lopsided=0.047):
    """Saturation: the microphone rounds off peaks, slightly lopsidedly; a steep band limit follows."""
    sound = dry[0] / (1 + (dry[0] / 0.66) ** 4) ** 0.25
    sound = sound + lopsided * sound ** 2
    return filtered(sound, lambda hz: 1 / np.sqrt(1 + (hz / TOP_HZ) ** 160))[None]


dry = scene()
out = record(dry)
waveform_to_disk(out)
```